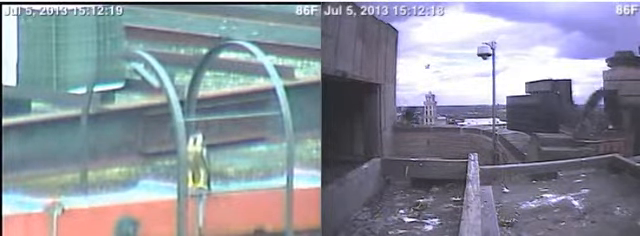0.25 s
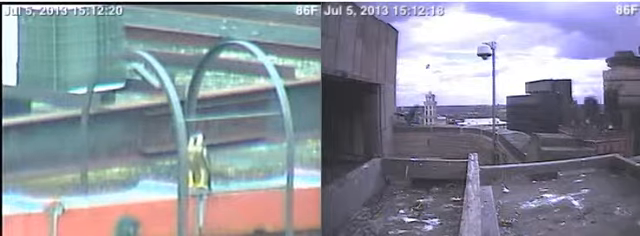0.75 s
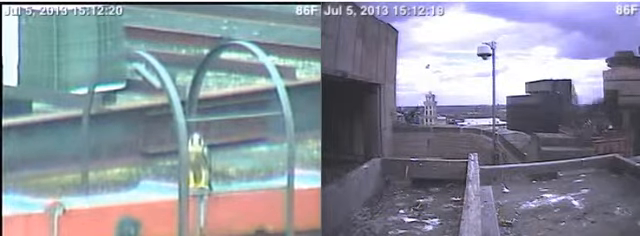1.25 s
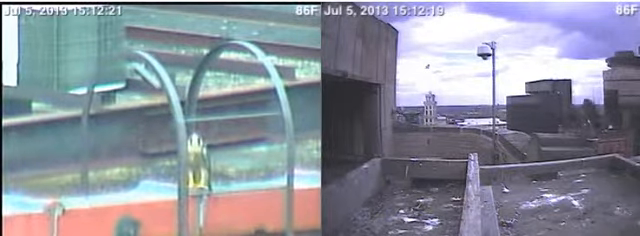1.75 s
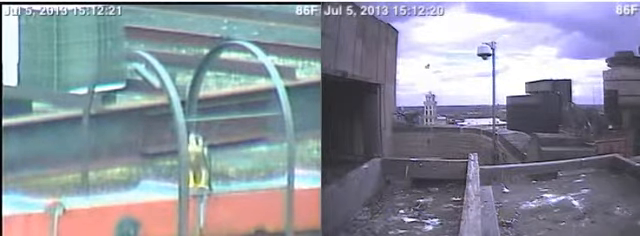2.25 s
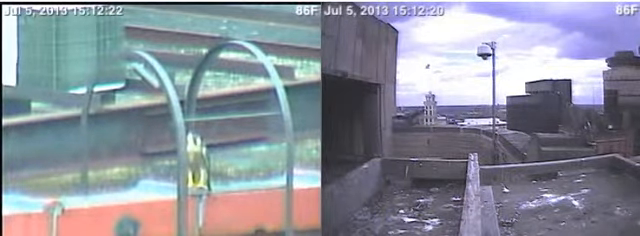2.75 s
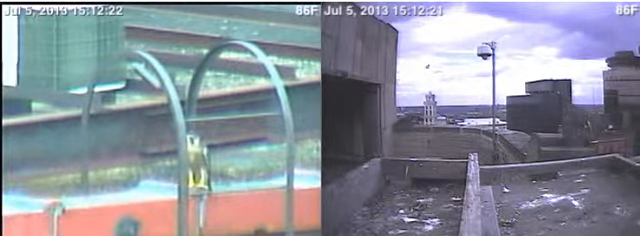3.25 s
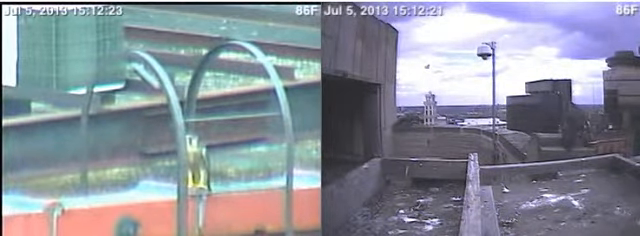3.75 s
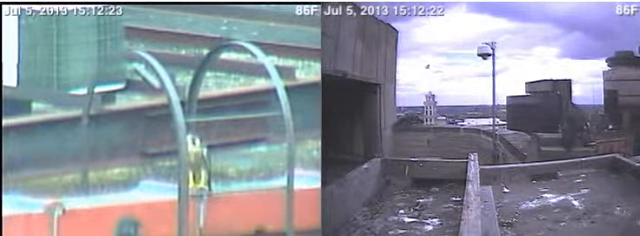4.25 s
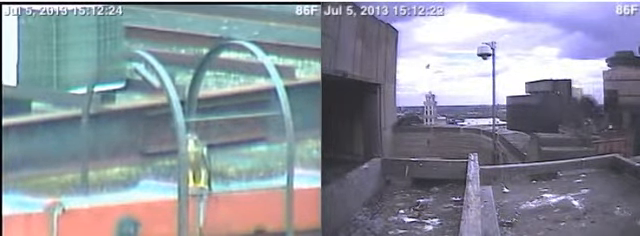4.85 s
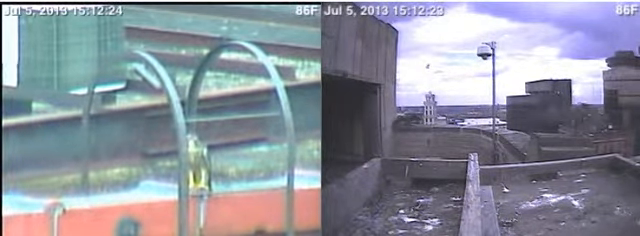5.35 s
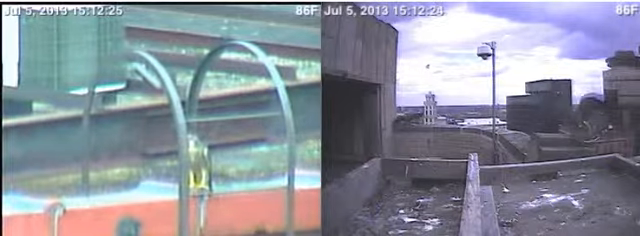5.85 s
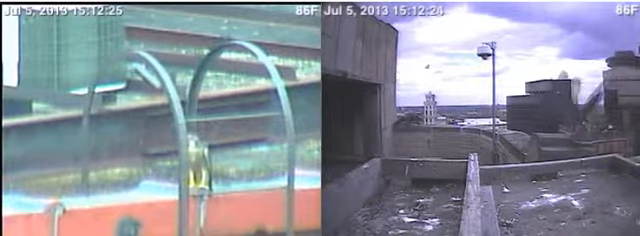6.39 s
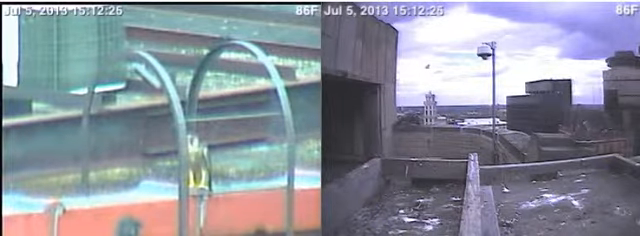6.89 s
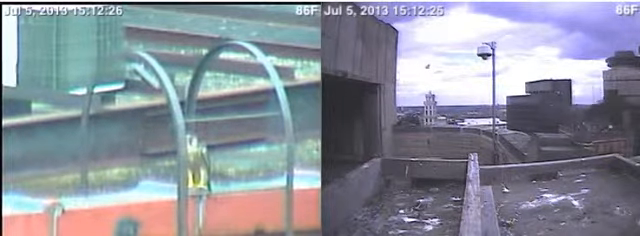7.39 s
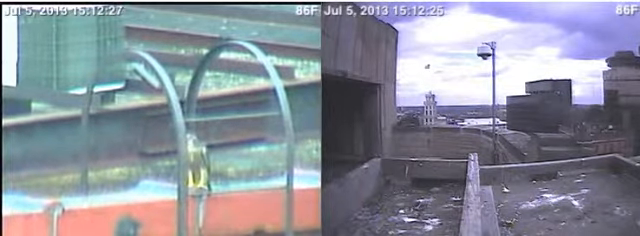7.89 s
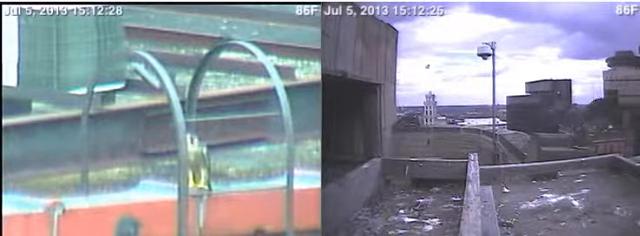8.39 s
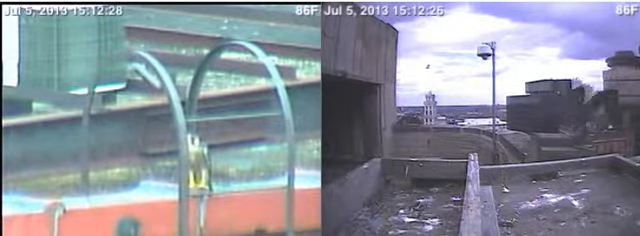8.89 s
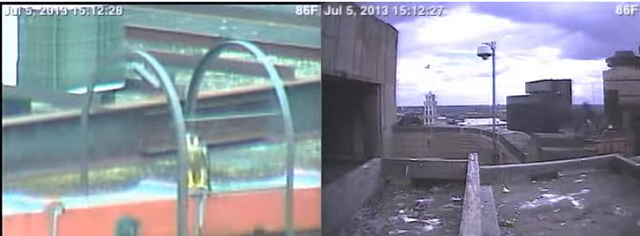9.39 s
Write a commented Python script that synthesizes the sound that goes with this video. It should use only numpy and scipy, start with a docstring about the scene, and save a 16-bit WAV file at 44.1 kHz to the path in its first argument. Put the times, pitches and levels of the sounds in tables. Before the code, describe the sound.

A falcon gives harsh, rasping calls close by, then a second bird wails faintly over a steady low city rumble.

```python
"""On a city rooftop, one microphone, a falcon close by. From the start, ventilation plant and traffic rumble
steadily below, and the background carries a broad peak near 2.5 kHz. In the first four seconds the falcon gives
seven harsh two-part calls, each a thin whistle that breaks into a full rasping note, while a second bird wails
faintly farther off. Between three and five seconds something scuffs on the ledge and claws tick on metal. The
far bird carries on in stepped phrases, leaving the last second to the city."""
import sys
import numpy as np
from scipy import signal
from scipy.fft import rfft, irfft, next_fast_len
from scipy.io import wavfile

SR = 44100
rng = np.random.default_rng(int(sys.argv[2]) if len(sys.argv) > 2 else 0)


def wav_out(sig):
    """Save sig, one row per channel (or a flat mono array), as 16-bit PCM at SR to the path in sys.argv[1]."""
    wavfile.write(sys.argv[1], SR, np.round(np.clip(np.atleast_2d(sig).T, -1, 1) * 32767).astype(np.int16))


N = 424683
TIME = np.arange(N) / SR


def falcon():
    """The near bird: a harmonic stack led by its second harmonic, with rasping breath around it."""
    # First part of a call. Each row: onset and end in seconds; first, top and last pitch in Hz;
    # onset, held, last and rasp level in dB.
    whistles = [ (.045, .125, 1228, 1271, 1270, -22.5, -31.5, -23.5, -31),
                (.182, 0.254, 1258, 1150, 1160, -18.5, -17.5, -26, -29),
                (.45, 0.534, 1226, 1255, 1232, -37, -29.5, -25, -34),
                (0.569, 0.719, 1167, 1262, 1260, -9.5, -18, -15, -29.5),
                (1.151, 1.302, 1158, 1240, 1162, -15, -21.5, -31, -29),
                (1.692, 1.802, 1153, 1240, 1198, -14, -20, -20, -32),
                (2.254, 2.403, 1038, 1210, 1215, -18, -18.5, -13.5, -32.5),
                (2.904, 3.062, 1142, 1230, 1310, -15, -25.5, -27, -31.5),
                (3.343, 3.47, 1172, 1259, 1228, -20, -20, -12, -31.5), ]
    # Second part. Each row: start of the hold, then entry, hold and tail length in seconds; entry, held,
    # last and cracked pitch in Hz; the same four as levels in dB; rasp and tail rasp in dB.
    screeches = [ (0.292, .04, .05, .09, 1380, 1238, 1203, 1208, -14, -10, -13, -15.5, -33, -22),
                 (0.781, .025, .12, 0.11, 1386, 1169, 1198, 1173, -19.5, -8.5, -13, -19, -35, -23.5),
                 (1.373, 0.097, .09, 0.11, 1400, 1243, 1242, 1082, -19.5, -11.5, -10, -12.5, -42, -23.5),
                 (1.845, 0.02, 0.055, 0.14, 1400, 1189, 1134, 1178, -21, -10.5, -13.5, -26.5, -25, -19.5),
                 (2.46, 0.022, 0.071, 0.14, 1400, 1196, 1144, 1203, -24.5, -10.5, -12, -27.5, -33, -19),
                 (3.086, .025, 0.023, 0.034, 1381, 1368, 1343, 1274, -20, -15, -19.5, -27, -24.5, -27),
                 (3.136, .02, .015, 0.12, 1100, 1070, 1041, 1033, -23.5, -12, -19.5, -27.5, -31, -33),
                 (3.495, .03, 0.03, 0.14, 1378, 1367, 1342, 1214, -16.5, -19.5, -9, -18, -24, -22), ]
    # Colour of the rasp. Each row: frequency in Hz, spectral level in dB.
    rasp_colour = [(1200, -13), (1650, -23), (2100, -2), (2450, 5), (2900, -15), (3500, -15.5),
                   (4400, -21.5), (6000, -19.5), (9500, -46.5)]
    # Gain of harmonics 3 to 7 by frequency. Each row: frequency in Hz, gain in dB.
    overtone_colour = [(3000, -28), (3700, -19.5), (4400, -46), (5000, -19), (6000, -23.5), (7000, -31),
                       (8500, -44.5)]
    # Stretches where every fourth cycle is stronger. Each row: start and end in seconds, depth 0 to 1.
    flutters = [(0.852, 0.932, 0.45), (1.384, 1.45, 0)]
    # A soft tone from the other side of the voice box. Each row: start and end in seconds, first and
    # last pitch in Hz, level in dB.
    undertones = [(0.06, 0.205, 1950, 2030, -36.5), (0.154, 0.275, 1410, 1405, -42),
                  (0.6, 0.727, 1926, 1870, -40), (1.158, 1.27, 2020, 1800, -42),
                  (2.926, 3.114, 1926, 2160, -35.5), (3.331, 3.467, 2090, 1915, -35)]
    wobble, rough_wobble, rough_waver_db = .0037, .02, 5   # more rasp, less steady pitch and strength
    odd_lift_db, effort = 21, .4   # overtones fade faster than the tone when the bird eases off
    hoarse, shatter = .55, 3   # overtones flicker, and flutter breaks them into noise
    out = np.zeros(N)
    rasp = coloured(rasp_colour) * amp(1.5 * drift(60))
    flutter = sum(depth * np.clip(np.minimum(TIME - start, end - TIME) / .012, 0, 1)
                  for start, end, depth in flutters)
    for rows in [whistle(*row) for row in whistles] + [screech(*row) for row in screeches]:
        span, ends, (hz, tone_db, rasp_db, fundamental_db) = stretch(rows)
        rough = np.clip(amp(rasp_db - tone_db), 0, 1) ** 2
        phase = turns(hz, wobble + rough_wobble * rough)
        tone_db = tone_db + rough_waver_db * rough * drift(40, len(hz))
        tone = amp(tone_db) * np.sin(2 * phase) + amp(fundamental_db) * np.sin(phase)
        intact = np.clip(1 - shatter * flutter[span], 0, 1)
        for k in range(3, 8):
            base_db = fundamental_db + odd_lift_db if k % 2 else tone_db
            overtone_db = base_db + effort * (tone_db + 9) + at_hz(overtone_colour, k * hz)
            flicker = intact + (hoarse + flutter[span]) * drift(280, len(hz))
            tone += flicker * amp(overtone_db) * np.sin(k * phase)
        tone *= np.sqrt(2) * (1 + flutter[span] * np.sin(phase / 4))
        breath = np.hypot(amp(rasp_db), amp(tone_db - 20))   # some air always leaks past the tone
        breath_ends = stretch(rows, fade=.02)[1]
        out[span] += ends * tone + breath_ends * breath * rasp[span]
    for start, end, from_hz, to_hz, db in undertones:
        span, ends, (hz,) = stretch([(start, from_hz), (end, to_hz)], fade=.014)
        husk = amp(db + 5.1 * drift(30, len(hz)))
        out[span] += ends * husk * np.sqrt(2) * np.sin(turns(hz, wobble))
    return out


def whistle(s, end, first_hz, top_hz, last_hz, onset_db, held_db, last_db, rasp_db):
    """Puff, accent, scoop, hold, choke. Each row: seconds, Hz, then tone, rasp and fundamental in dB."""
    puff_s, attack_s, settle_s, scoop_s, flare_s, choke_s = .035, .013, .03, .06, .03, .052
    puff_db, attack_db = -14, -25   # against the accent
    early, later = -23, -31.5   # fundamental in dB against the tone
    choked = (last_hz, last_db - 21, rasp_db + 5.5, last_db + later)   # the tone drops, the rasp swells
    held = (held_db, rasp_db, held_db + later)
    return sorted([(s - puff_s, first_hz, onset_db + puff_db, rasp_db, onset_db + later),
                   (s - attack_s, first_hz, onset_db + attack_db, rasp_db, onset_db + early),
                   (s, first_hz, onset_db, rasp_db, onset_db + early),
                   (s + settle_s, first_hz + .69 * (top_hz - first_hz), *held),
                   (min(s + scoop_s, end - flare_s - attack_s), top_hz, *held),
                   (end - flare_s, last_hz, min(held_db, last_db), rasp_db, held_db + later),
                   (end, last_hz, last_db, rasp_db, last_db + later),
                   (end + attack_s, *choked), (end + choke_s, *choked)])


def screech(s, entry_s, hold_s, tail_s, entry_hz, held_hz, last_hz, cracked_hz,
            entry_db, held_db, last_db, cracked_db, rasp_db, tail_rasp_db):
    """High entry, drop to a held note, crack, sinking rasping tail. Rows as for the whistle."""
    crack, tail_hz = s + hold_s + .03, 1227
    swell_db, entry_fundamental_db, tail_fundamental_db = 16, -10.5, -20
    sagged_hz = entry_hz - .3 * (entry_hz - held_hz)

    def tail(after_s, hz, tone_drop_db, rasp_drop_db):
        tone_db = cracked_db - tone_drop_db
        return crack + after_s, hz, tone_db, tail_rasp_db - rasp_drop_db, tone_db + tail_fundamental_db

    soft_db = entry_db - swell_db
    return sorted([(s - entry_s, entry_hz, soft_db, rasp_db, soft_db + entry_fundamental_db),
                   (s - .3 * entry_s, sagged_hz, entry_db, rasp_db, entry_db + entry_fundamental_db),
                   (s, held_hz, held_db, rasp_db, held_db - 19.5),
                   (s + hold_s, last_hz, last_db, rasp_db, last_db - 17),
                   tail(0, cracked_hz, 0, 0),
                   tail(.015, tail_hz, 5, 0),   # right after the crack the pitch jumps back
                   tail(.33 * tail_s, tail_hz, 10, 10),
                   tail(tail_s, tail_hz, 23.5, 23.5)])


def far_bird():
    """Arched wails with breaks of register, closing yelps and rising whistles; Hz is of harmonic 2."""
    # Each row: start and end in seconds, first and last frequency in Hz, level in dB.
    wails = [(0.057, 0.264, 3530, 3040, -43.5), (0.714, 0.767, 3635, 3000, -46),
             (1.001, 1.108, 3400, 3290, -51), (1.162, 1.324, 3420, 3040, -41),
             (2.948, 3.06, 3440, 3370, -46), (3.72, 3.865, 3480, 3430, -54), (3.945, 4.1, 3420, 3320, -52),
             (4.438, 4.904, 3346, 3410, -48.5), (5.248, 5.78, 3450, 3350, -47),
             (6.046, 6.598, 3320, 3335, -50.5), (6.968, 7.525, 3500, 3270, -50),
             (7.93, 8.498, 3350, 3320, -48)]
    # Drops to a lower, louder register. Each row: start and length in seconds, frequency in Hz, lift in dB.
    breaks = [(3.942, 0.033, 2900, 12), (5.5, 0.061, 2870, 5), (5.639, 0.033, 3000, 4),
              (6.336, 0.079, 2950, 10.5), (6.471, 0.088, 2966, 8), (7.293, 0.075, 3000, 6),
              (7.418, 0.073, 2674, 14.5), (8.135, 0.092, 3207, 3), (8.245, .15, 2800, 8)]
    # Each row: start in seconds, level in dB.
    yelps = [(4.095, -36.5), (4.88, -38.5), (5.777, -33.5), (6.607, -37), (7.533, -31), (8.485, -33.5)]
    # Each row: start and length in seconds, first frequency in Hz, level in dB.
    rising_whistles = [(4.376, .08, 2466, -40.5), (5.155, 0.12, 2290, -37), (7.837, 0.0946, 2257, -35)]
    arch_hz, jump_s, jump_dip_db = 38.6, .012, -14.5   # the voice nearly drops out in the jump
    out = np.zeros(N)
    for start, end, from_hz, to_hz, db in wails:
        span, ends, (hz, bow) = stretch([(start, from_hz, 0), (end, to_hz, np.pi)], fade=.005)
        hz = hz + arch_hz * (2 * np.sin(bow) - 1)
        for s, length, low_hz, lift_db in breaks:
            low = np.clip(np.minimum(TIME[span] - s, s + length - TIME[span]) / jump_s + 1, 0, 1)
            hz = hz + low * (low_hz - hz)
            db = db + low * lift_db + jump_dip_db * np.sin(np.pi * low)
        out[span] += ends * far_note(hz, db, wobble=.014)
    for s, db in yelps:
        span, ends, (hz,) = stretch([(s, 2880), (s + .07, 2240)], fade=.011)
        out[span] += ends * far_note(hz, db, wobble=.025)
    top_hz = 2490
    for s, length, from_hz, db in rising_whistles:
        rise = [(s, from_hz), (s + .6 * length, top_hz), (s + length, top_hz)]
        span, ends, (hz,) = stretch(rise, fade=.009)
        out[span] += ends * far_note(hz, db, wobble=.004)
    return out


def far_note(second_hz, db, wobble):
    """A thin hoarse stack of three harmonics that wavers in pitch and strength."""
    # The fundamental. Each row: pitch in Hz, level in dB against the second harmonic.
    fundamental_levels = [(1250, -12), (1700, -2)]
    hz = second_hz / 2
    phase = turns(hz * (1 + .009 * drift(8, len(hz))), wobble)
    husk = amp(db + 4 * drift(20, len(hz)))   # the voice comes and goes
    fundamental = amp(at_hz(fundamental_levels, hz)) * np.sin(phase)
    return husk * np.sqrt(2) * (fundamental + np.sin(2 * phase) + amp(-24) * np.sin(3 * phase))


def ledge_scuffs():
    """Scuffs on the ledge and ticks of claws on metal: short bursts of band-passed grit."""
    # Each row of both: peak time in seconds, level in dB before the filter, rise and decay time in
    # seconds, band centre in Hz.
    scuffs = [(3.145, -0.5, .015, 453), (4.294, -15, .0048, 2100), (4.301, -22, .0082, 7300),
              (4.784, -39, .017, 7000)]
    claw_ticks = [(4.2513, -14, .0002, 4800), (4.2583, -18, .0003, 4500)]
    out = np.zeros(N)
    for s, db, decay_s, hz in scuffs + claw_ticks:
        span = slice(int((s - 4 * decay_s) * SR), int((s + 4 * decay_s + .003) * SR))
        grit = rng.standard_normal(len(TIME[span])) * np.exp(-np.abs(TIME[span] - s) / decay_s)
        band = signal.butter(1, [hz * .9, hz * 1.135], "band", fs=SR, output="sos")
        out[span] += amp(db) * signal.sosfilt(band, grit)
    return out


def roof_echoes(sound, t60_s):
    """Scatter from the walls round the roof, arriving from 8 ms after the direct sound."""
    lag = TIME[:SR // 2]
    walls = rng.standard_normal(len(lag)) * amp(-60 * lag / t60_s) * (lag > .008)
    return signal.fftconvolve(sound, walls / np.linalg.norm(walls))[:N]


def city():
    """Low rumble of traffic and ventilation plant, with two resonances of ventilation ducts; the whole
    background carries a broad peak near 2.5 kHz."""
    # Each row: frequency in Hz, spectral level in dB.
    background_colour = [(28, -47.5), (45, -20.5), (80, -7.5), (142, 0), (200, -5.5), (263, -2),
                         (514, -22.5), (627, -23), (1220, -32), (1490, -38), (2510, -29), (3700, -48),
                         (4500, -52.5), (5830, -46.5), (7100, -56.5), (7500, -70), (9340, -90.5)]
    # Each row: resonance and its width in Hz, level in dB against the background noise.
    ducts = [(136.7, 2.6, -16.5), (267.2, 6.2, -11)]
    # Background noise and ducts together. Each row: time in seconds, level in dB.
    levels = [(0, -20), (4, -19.5), (9.63, -17)]
    drones = 0
    for hz, width_hz, db in ducts:
        radius = np.exp(-np.pi * width_hz / SR)
        feedback = [1, -2 * radius * np.cos(2 * np.pi * hz / SR), radius * radius]
        ring = signal.lfilter([1, 0, -1], feedback, rng.standard_normal(N))
        drones = drones + amp(db) * rms_one(ring)
    return amp(np.interp(TIME, *np.transpose(levels))) * rms_one(coloured(background_colour) + drones)


def amp(db):
    """Decibels to gain."""
    return 10 ** (np.asarray(db) / 20)


def rms_one(x):
    """Scale to unit rms."""
    return x / np.sqrt(np.mean(x ** 2) + 1e-20)


def at_hz(points, hz):
    """Read a spectrum on a log-frequency axis."""
    point_hz, point_db = np.transpose(points)
    return np.interp(np.log(hz), np.log(point_hz), point_db)


def drift(rate_hz, size=N):
    """Slow random wander of mean 0 and spread 1."""
    r = np.exp(-2 * np.pi * rate_hz / SR)
    slow = signal.lfilter([1], [1, -2 * r, r * r], rng.standard_normal(size + 9000))[9000:]
    return rms_one(slow - slow.mean())


def coloured(spectrum):
    """Noise with a given spectrum, rms 1."""
    size = next_fast_len(N)
    hz = np.arange(size // 2 + 1) * SR / size + 1
    slope = np.minimum(hz / spectrum[0][0], 1) ** 2   # falls away under the first point
    shaped = rfft(rng.standard_normal(size)) * slope * amp(at_hz(spectrum, hz))
    return rms_one(irfft(shaped, size)[:N])


def stretch(rows, fade=.002):
    """The samples that timed rows cover, a gain with soft ends, and the columns interpolated there."""
    s, *columns = np.transpose(rows)
    span = slice(int(s[0] * SR), int(s[-1] * SR))
    t = TIME[span]
    ends = np.clip(np.minimum(t - t[0], t[-1] - t) / fade, 0, 1)
    return span, ends, [np.interp(t, s, column) for column in columns]


def turns(hz, wobble):
    """Running phase in radians of a pitch that wavers by the share `wobble`."""
    return 2 * np.pi * np.cumsum(hz * (1 + wobble * drift(58.7, len(hz)))) / SR


def scene():
    """Both birds, their echoes and the ledge over the city, in mono."""
    near, far = falcon(), far_bird()
    echoes = roof_echoes(near + amp(9) * far, t60_s=.3)   # the far bird is heard more by its echoes
    return (near + far + amp(-14) * echoes + ledge_scuffs() + city())[None]


def record(dry):
    """Peaks are rounded and the treble is gone above 10.6 kHz."""
    lowpass = signal.cheby2(12, 70, 10600, fs=SR, output="sos")
    return signal.sosfilt(lowpass, 1.126 * np.tanh(dry / 1.148))


dry = scene()
out = record(dry)
wav_out(out)
```